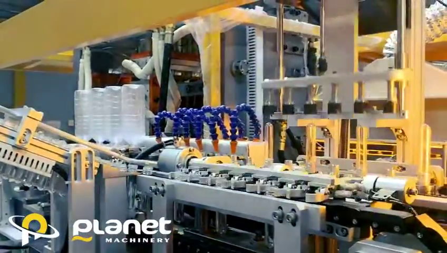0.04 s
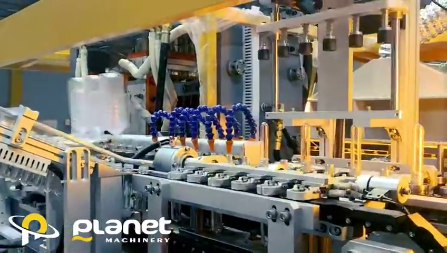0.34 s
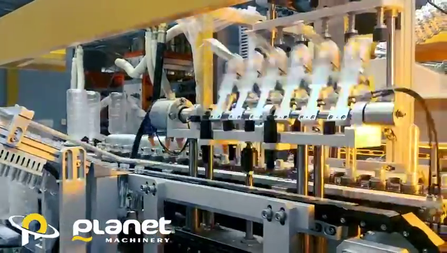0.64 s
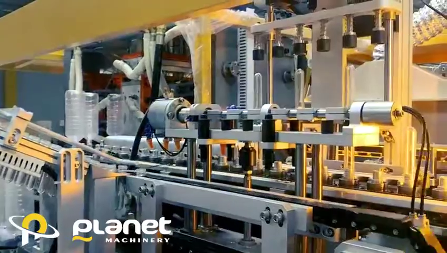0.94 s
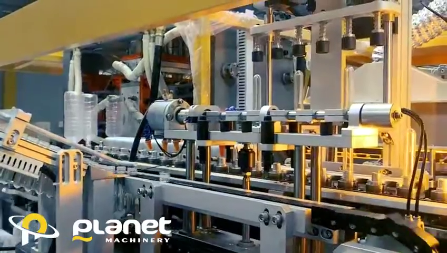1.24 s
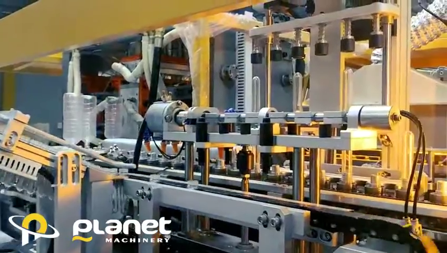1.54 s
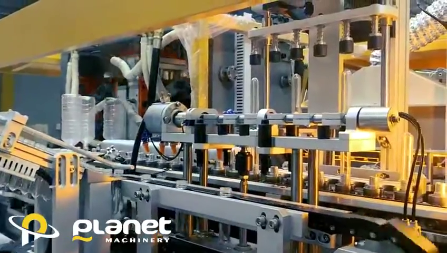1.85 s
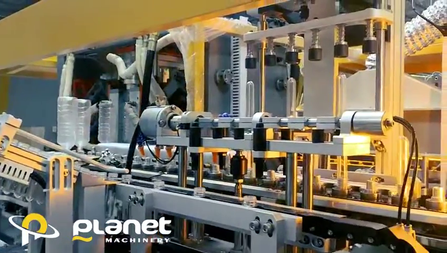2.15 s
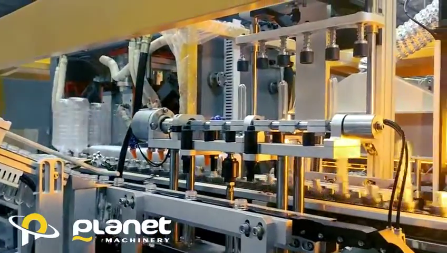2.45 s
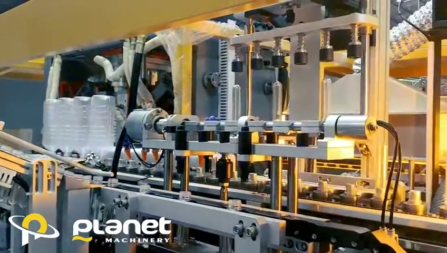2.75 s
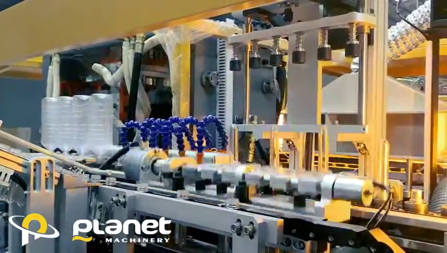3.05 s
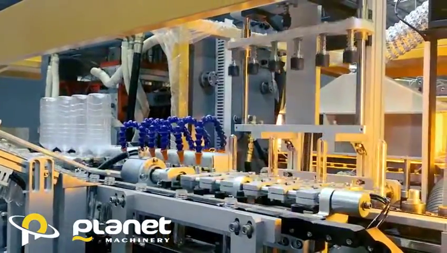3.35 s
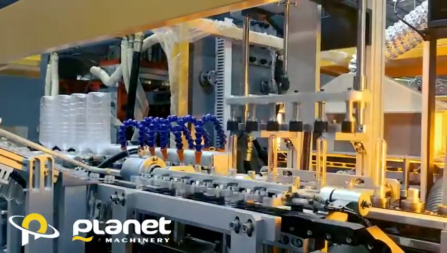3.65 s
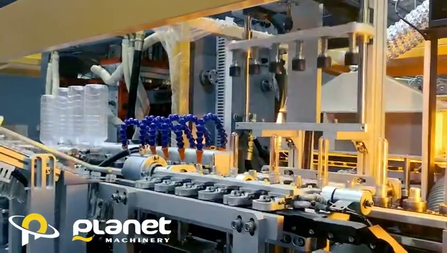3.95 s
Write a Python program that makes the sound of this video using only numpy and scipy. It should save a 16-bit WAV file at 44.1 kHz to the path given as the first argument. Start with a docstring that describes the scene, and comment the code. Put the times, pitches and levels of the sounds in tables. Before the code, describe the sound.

Factory machine working, with steel clacks, sharp snaps and bursts of compressed air over steady noise.

```python
"""A noisy factory hall, where a bottle blow molding machine runs through one cycle.
Steel grippers clack against their stops, the mold rumbles shut, and the blowing air is dumped
through a silencer in one long hiss. Small valves puff, a carriage slides and loose links rattle
over a bed of hall noise and whining drives. Sharp snaps close by make a limiter duck the hall."""
import sys
import numpy as np
from scipy import signal
from scipy.fft import rfft, irfft
from scipy.io import wavfile
from scipy.ndimage import uniform_filter1d

SR = 44100
rng = np.random.default_rng(int(sys.argv[2]) if len(sys.argv) > 2 else 0)


def dump(signal):
    """Clip the signal to [-1, 1] and save it as 16-bit WAV at the path in sys.argv[1]."""
    limited = np.clip(np.atleast_2d(signal).T, -1, 1)
    pcm = np.round(limited * 32767).astype(np.int16)
    wavfile.write(sys.argv[1], SR, pcm)


N = 176400
TIME = np.arange(N) / SR


def amp(db):
    """Decibels to gain."""
    return 10 ** (np.asarray(db) / 20)


def curve_at(points, hz):
    """A curve's value on a log-frequency axis."""
    freqs, values = np.transpose(points)
    return np.interp(np.log(hz + 1), np.log(freqs), values)


def fader(points):
    """Gain along a level curve, silent outside it."""
    return amp(np.interp(TIME, *np.transpose(points), left=-120, right=-120))


def pan(db):
    """Stereo gains, with the left db louder than the right."""
    return amp(np.array([[db], [-db]]) / 2)


def add(mix, start_s, sound):
    """Drops a sound into the mix."""
    part = mix[:, max(round(start_s * SR), 0):][:, :sound.shape[1]]
    part += sound[:, :part.shape[1]]


def wander(rate_hz, size=N):
    """Smooth random movement of rms 1."""
    hz = np.fft.rfftfreq(size, 1 / SR)
    drift = irfft(rfft(rng.standard_normal(size)) / (1 + (hz / rate_hz) ** 4), size)
    return drift / drift.std()


def decay(t, t60):
    """Falls 60 dB in t60 seconds."""
    return np.exp(-np.log(1000) * t / t60)


# Stereo image, left against right: freq_hz, correlation
STEREO_IMAGE = [(70, 1), (130, 0.98), (250, 0.98), (500, -0.22), (1000, 0.31), (2000, -0.073),
                (4000, -0.061)]

def noise(spectrum, size=N):
    """Shaped stereo noise, centred in the bass and wide above it."""
    hz = np.fft.rfftfreq(size, 1 / SR)
    left, spare = rfft(rng.standard_normal((2, size)))
    alike = np.clip(curve_at(STEREO_IMAGE, hz), -1, 1)
    right = alike * left + np.sqrt(1 - alike ** 2) * spare
    return irfft(np.array([left, right]) * amp(curve_at(spectrum, hz)), size) * np.sqrt(SR / 2)


# Factory room tone: freq_hz, density_db_per_hz
ROOM_TONE = [(25, -76), (50, -62), (75, -68), (115, -64), (170, -56.5), (250, -55), (350, -61.5),
             (500, -67.5), (1000, -66), (1400, -66.5), (1800, -61), (2300, -63.5), (3300, -73.5),
             (4500, -77.5), (6300, -79), (8000, -90.5), (15000, -79)]
# Drive whine: pitch_hz, level_db
WHINE_TONES = [(5905, -51.5), (5970, -51.5), (12188, -46)]
# Fader ride on the whine: time_s, gain_db
WHINE_RIDE = [(0, -3), (2.6, -2), (2.95, 2), (3.25, 0), (3.4, 3), (4.1, -8)]

def hall(flutter_db=0.5, waver_hz=12):
    """A steady bed of factory noise with the thin, wavering whine of drives."""
    out = noise(ROOM_TONE) * amp(flutter_db * wander(rate_hz=36))
    for hz, db in WHINE_TONES:
        turns = np.cumsum(hz + waver_hz * wander(rate_hz=49)) / SR
        whine = np.sqrt(2) * np.sin(2 * np.pi * (turns + rng.random((2, 1)) / 2))
        out += amp(db) * fader(WHINE_RIDE) * whine
    return out


def panels(sound, echo_db=-7, t60=0.15, low_cut_hz=450, count=30):
    """Guard panels throw back early reflections above the bass."""
    taps = np.zeros((2, SR // 20))
    for side in taps:
        delays = rng.integers(SR // 500, len(side), count)
        side[delays] = rng.choice([-1, 1], count) * decay(delays / SR, t60)
    taps /= np.linalg.norm(taps, axis=1, keepdims=True)
    taps = signal.sosfilt(signal.butter(2, low_cut_hz, "high", fs=SR, output="sos"), taps)
    echoes = signal.oaconvolve(sound, taps, axes=1)[:, :N]
    return (sound + amp(echo_db) * echoes) / np.hypot(1, amp(echo_db))


def rattle(ticks_per_s=16, gain_db=-22, spread_db=3, crack_db=-3, t60=0.2, size=8192):
    """Loose links and bottles tick at random, with the same ring and crack as the clacks."""
    out = np.zeros((2, N))
    for when, strength, side in rng.random((int(ticks_per_s * N / SR), 3)):
        tick = noise(STEEL_RING, size) + amp(crack_db) * noise(CONTACT_CRACK, size)
        gain = amp(gain_db + spread_db * (2 * strength - 1)) * pan(10 * (side - .5))
        add(out, when * N / SR, gain * tick * decay(TIME[:size], t60))
    return out


# Rolling texture of the rails: freq_hz, density_db_per_hz
RAIL_NOISE = [(60, -72), (160, -50), (300, -52), (500, -53.5), (750, -57.5), (1000, -60), (1400, -54.5),
              (2100, -54), (2700, -60), (4500, -75), (7400, -71), (15000, -89)]
# Fader ride over the carriage's two moves: time_s, gain_db
RAIL_RIDE = [(2.35, -27), (2.55, -6.5), (2.68, 1), (2.8, -2.5), (2.93, -14), (3.05, -27), (3.35, -13),
             (3.47, -4), (3.62, -13)]

def carriage(grain_db=1.74, pan_db=-2.0):
    """Bearings roll along the rails, loudest at full speed."""
    return noise(RAIL_NOISE) * fader(RAIL_RIDE) * amp(grain_db * wander(rate_hz=110)) * pan(pan_db)


# Low end of heavy parts in motion: freq_hz, density_db_per_hz
MOLD_RUMBLE = [(25, -72), (50, -49), (75, -51.5), (125, -42.5), (165, -49.5), (240, -53), (330, -59),
               (500, -60.5), (1000, -112)]
# Hum of their motors: pitch_hz, level_db
MOTOR_HUM = [(76, -29), (109, -31.5)]
# Fader ride on rumble and hum: time_s, gain_db
MOLD_RIDE = [(0, -11), (.28, -11.5), (.36, -8), (.43, -8.5), (.8, -12.5), (.94, -1.5), (1.07, 2.5),
             (1.2, -3.5), (1.3, -8), (1.48, -9), (1.55, -15.5), (2.4, -14), (2.7, -10.5), (3.15, -9),
             (3.33, -5), (3.5, 1.5), (3.62, -11.5), (4.05, -14)]
# Hollow knocks of the housing: start_s, pitch_hz, level_db, t60_s
HOUSING_KNOCKS = [(0.801, 255.8, -20, 0.74), (.857, 245, -5.5, 0.11), (.93, 321, -24.5, 0.29),
                  (1.024, 243, -12.5, 0.21), (1.589, 306, -10.5, 0.082), (2.035, 366, -17, 0.2)]

def mold(waver_hz=4, shudder=0.041, attack_s=0.0066):
    """Heavy parts rumble and hum as they travel and knock the hollow housing."""
    out, t = noise(MOLD_RUMBLE), TIME[:SR // 2]
    for hz, db in MOTOR_HUM:
        turns = np.cumsum(hz + waver_hz * wander(rate_hz=11.8)) / SR
        out += amp(db) * np.sin(2 * np.pi * turns)
    out *= fader(MOLD_RIDE)
    for start, hz, db, t60 in HOUSING_KNOCKS:
        envelope = np.minimum(t / attack_s, 1) * decay(t, t60)
        turns = np.cumsum(hz * (1 + shudder * wander(rate_hz=90, size=len(t)))) / SR
        add(out, start, amp(db) * envelope * np.sin(2 * np.pi * turns) * pan(0))
    return out


# Bright bite of a snap: freq_hz, density_db_per_hz
SNAP_NOISE = [(100, -78), (700, -58), (1500, -54), (2350, -33.5), (3300, -53.5), (5000, -48), (7400, -48.5),
              (11000, -46.5), (15000, -43)]
# Snap cues: start_s, gain_db, t60_s, push_db
SNAP_CUES = [(0.369, -4.5, 0.038, -19), (0.3746, 17.5, 0.044, -23), (0.3963, 12.5, 0.02, -16),
             (3.968, -5.5, 0.059, -27), (3.982, 9, 0.022, -35), (3.9945, 16, 0.015, 10)]

def snaps(tail_db=-30, tail_t60=0.26, push_s=0.00083, pan_db=4, size=8192):
    """Dry, very loud snaps up close, each with a low push of air."""
    out, t = np.zeros((2, N)), TIME[:size]
    push = t / push_s * np.exp(1 - t / push_s)
    for start, db, t60, push_db in SNAP_CUES:
        envelope = decay(t, t60) + amp(tail_db) * decay(t, tail_t60)
        crack = noise(SNAP_NOISE, size) * envelope * pan(pan_db)
        add(out, start, amp(db) * crack + amp(push_db) * push)
    return out


def pipe(hiss, resonances):
    """A pipe rings under the hiss that passes through it."""
    hz = np.fft.rfftfreq(N, 1 / SR)
    peaks = sum(amp(db) ** 2 / (1 + (2 * (hz - centre) / width) ** 2)
                for centre, width, db in resonances)
    return irfft(rfft(hiss) * np.sqrt(1 + peaks), N)


# Silencer blast, throaty cylinder vent and thin leak: freq_hz, density_db_per_hz
EXHAUST_HISS = [(300, -92), (950, -68.5), (1400, -64.5), (1850, -55.5), (2750, -51), (3200, -57),
                (4500, -57), (6300, -58.5), (8000, -59.5), (15000, -56)]
VENT_HISS = [(600, -81), (1550, -60), (1900, -55.5), (2300, -49.5), (2800, -53.5), (3100, -64), (4500, -62),
             (7400, -70.5), (15000, -75)]
LEAK_HISS = [(1500, -93), (3000, -82), (6000, -86), (11000, -85), (15000, -71.5)]
# Ring of the exhaust pipe and the vent's tube: centre_hz, width_hz, over_hiss_db
EXHAUST_PEAKS = [(640, 13, 15), (760, 10.6, 20), (2560, 38, -2)]
VENT_PEAKS = [(1833, 30, 12), (2010, 25, 6), (2070, 25, -5), (2874, 27, 10.5)]
# Flow through the silencer: time_s, gain_db
EXHAUST_RIDE = [(1.492, -9.5), (1.507, 6), (1.535, 13), (1.60, 0), (1.66, 0), (1.93, -1), (1.965, 4),
                (2.015, -4.5), (2.15, -8), (2.4, -20.5), (2.55, -14.5)]
# Valve puffs: start_s, length_s, vent_db, leak_db, slope_db_per_s, pan_db
PUFF_CUES = [(-.05, 0.075, -21, 10.5, 0, 7), (0.049, 0.13, -4.5, -5, -17, -0.5),
             (0.578, 0.23, -33, 2.5, -2, 4), (1.499, 0.051, 6.5, -8, -5, -2),
             (2.091, 0.29, -19, 9.5, 14, 12), (3.035, 0.24, -15, 6.5, 0, 2),
             (3.458, 0.2, -12.5, 13.5, -23, 5), (3.661, 0.073, 1, -14, -14, 0.5)]

def air(flutter_db=0.8, exhaust_pan_db=1.0, attack_s=0.029, release_s=0.068):
    """Compressed air escapes in one long exhaust blast and short puffs from the cylinder valves."""
    out = pipe(noise(EXHAUST_HISS), EXHAUST_PEAKS) * fader(EXHAUST_RIDE) * pan(exhaust_pan_db)
    vent, leak = pipe(noise(VENT_HISS), VENT_PEAKS), noise(LEAK_HISS)
    for start, length, vent_db, leak_db, slope_db_per_s, pan_db in PUFF_CUES:
        t = TIME - start
        flow = np.clip(t / attack_s, 0, 1) * amp(slope_db_per_s * np.clip(t, 0, length))
        release = np.exp(-np.maximum(t - length, 0) / release_s)
        jets = amp(vent_db) * vent * release + amp(leak_db) * leak * release ** 3
        out += flow * jets * pan(pan_db)
    return out * amp(flutter_db * wander(rate_hz=49))


# Dense frame ring, crack of contact, lower ring of heavy parts: freq_hz, density_db_per_hz
STEEL_RING = [(500, -105), (1200, -50.5), (1650, -43), (2050, -42.5), (2600, -46), (3300, -54), (4500, -65),
              (7000, -80), (15000, -61)]
CONTACT_CRACK = [(1500, -64), (3000, -53), (5000, -55.5), (7500, -59), (15000, -57)]
HEAVY_BODY = [(200, -56), (500, -58), (800, -48.5), (1080, -45.5), (1400, -50), (2200, -66), (5000, -102)]
STEEL_ATTACK_S = 0.0013

def clack(modes, db, crack_db, body_db, t60, pan_db,
          bloom_s=0.0022, crack_t60=0.14, chatter_db=3.0, detune=0.0042, size=16384):
    """One steel hit: a crack, a chattering dense ring that blooms, and the struck part's own modes."""
    t = TIME[:size]
    ring = noise(STEEL_RING, size) + amp(body_db) * noise(HEAVY_BODY, size)
    out = ring * decay(t, t60) * np.minimum(t / bloom_s, 1)
    out += amp(crack_db) * noise(CONTACT_CRACK, size) * decay(t, crack_t60)
    out *= amp(chatter_db * (wander(rate_hz=146, size=size) - 1.0))
    for hz, mode_db, mode_t60 in modes:
        turns = hz * (1 + detune * rng.standard_normal()) * t + rng.random((2, 1))
        side_gains = .5 + rng.random((2, 1)) / 2
        out += amp(mode_db) * side_gains * decay(t, mode_t60) * np.sin(2 * np.pi * turns)
    return amp(db) * out * np.minimum(t / STEEL_ATTACK_S, 1) * pan(pan_db)


# Modes of the steel frame and of the jaws: pitch_hz, level_db, t60_s
FRAME_MODES = [(1070, -27, .2), (1570, -24, .2), (1700, -18, .27), (1850, -20, .25), (1950, -20, .16),
               (2035, -14, .2), (2540, -26, .2)]
JAW_MODES = [(1534, -20, .14), (2215, -17, .12), (2320, -19, .11), (2720, -25, .12)]
# Hits on the stops, and jaws latching: start_s, gain_db, crack_db, body_db, t60_s, pan_db
STOP_CUES = [(.211, 2, -20, -4, 0.12, 4), (.555, -2, -11, -15, 0.17, 4.5), (.567, -4, -26, -0.5, 0.22, -2),
             (.609, -5.5, -20, -11, 0.11, 2), (.627, -5.5, -24, -4.5, 0.29, 1),
             (0.661, -5, -10, -11, 0.17, 3), (.705, -13, -14, 4, 0.62, 0.5), (.817, -13.5, 1, -4, 0.21, 2),
             (.937, -6, -11.5, 1, 0.26, 0.5), (1.235, -14.5, 3.5, -10, 0.24, 2),
             (1.457, -10, 4, -1, 0.21, 1), (1.514, -5.5, -9, -22, 0.54, -14),
             (1.945, -1, 0, 3.5, 0.57, 1.5), (2.045, -17.5, 10, 16, 0.2, 6), (2.269, -9, 6, -9, 0.075, 0),
             (3.181, -8, -21, 0.5, 0.46, -1), (3.537, -0.5, -2, -8.5, 0.17, 1.5),
             (3.814, 1.5, -14, -4, 0.065, -1), (3.827, -3, -27, -8, 0.11, 3.5)]
LATCH_CUES = [(3.367, -4.5, 1, -17, 0.25, 4.5), (3.405, 4, -3.5, -5, 0.056, 4),
              (3.422, 4.5, -3, -6, 0.11, 0.5)]
# Small pins and rods set ringing: start_s, pitch_hz, level_db, t60_s, pan_db
PING_CUES = [(0.709, 1459, -27.5, 0.54, -3), (1, 2290, -19.5, 0.057, 8), (1.31, 2330, -21, 0.11, 4),
             (2.043, 835, -21, 0.15, 2), (3.181, 2825, -20.5, 0.079, -12), (3.183, 3480, -28, 0.1, -15),
             (3.367, 1480, -18.5, 0.12, -11), (3.406, 14970, -5.5, 0.082, 12),
             (3.813, 4500, -26, 0.08, -12)]

def grippers(buzz=0.016):
    """Steel grippers hit their stops, their jaws flip and latch, and loose pins ping with a buzz."""
    out, t = np.zeros((2, N)), TIME[:SR // 4]
    for start, *hit in STOP_CUES:
        add(out, start, clack(FRAME_MODES, *hit))
    for start, *hit in LATCH_CUES:
        add(out, start, clack(JAW_MODES, *hit))
    for start, hz, db, t60, pan_db in PING_CUES:
        turns = np.cumsum(hz * (1 + buzz * wander(rate_hz=180, size=len(t)))) / SR
        envelope = np.minimum(t / STEEL_ATTACK_S, 1) * decay(t, t60)
        add(out, start, amp(db) * envelope * np.sin(2 * np.pi * turns) * pan(pan_db))
    return out


def scene():
    """The full mix: mold and snaps stay dry, the rest bounces off the guard panels."""
    return panels(hall() + air() + carriage() + grippers() + rattle()) + mold() + snaps()


# Microphone colour: freq_hz, gain_db
MIC_EQ = [(6300, -1.5), (7400, 7), (8000, -2.5), (8700, -18), (9800, -21.5), (11000, -17.5), (15000, -20.5)]

def record(dry, threshold_db=-9.5, release_db_per_s=132, high_cut_hz=15500):
    """Master chain: microphone colour, a limiter that ducks after peaks, a clipper and a high cut."""
    eq = amp(curve_at(MIC_EQ, np.fft.rfftfreq(2 * N, 1 / SR)))
    coloured = irfft(rfft(dry, 2 * N) * eq)[:, :N]
    power = uniform_filter1d((coloured ** 2).mean(0), size=64)
    power_db = 10 * np.log10(abs(power) + 1e-12)
    fall_db = TIME * release_db_per_s
    held_db = np.maximum.accumulate(power_db + fall_db) - fall_db  # jumps to peaks, then sinks
    duck_db = uniform_filter1d(np.maximum(held_db - threshold_db, 0), size=32)
    limited = np.clip(coloured * amp(-duck_db), -1, 1)
    high_cut = signal.firwin(255, high_cut_hz, window=("kaiser", 9), fs=SR)
    return signal.oaconvolve(limited, high_cut[None], "same")


dry = scene()
out = record(dry)
dump(out)
```